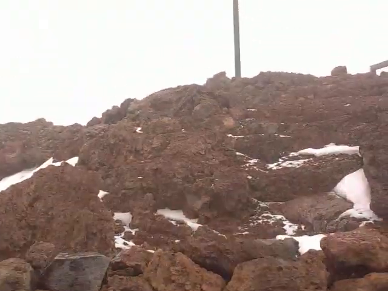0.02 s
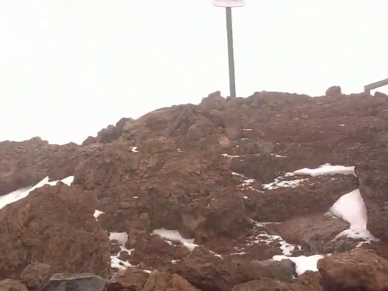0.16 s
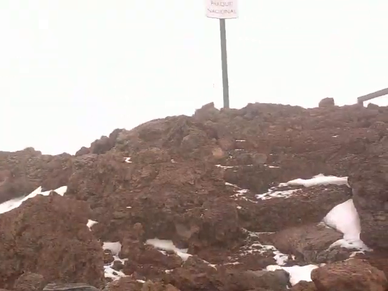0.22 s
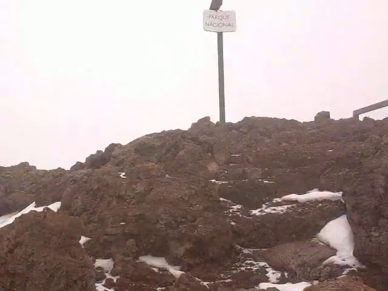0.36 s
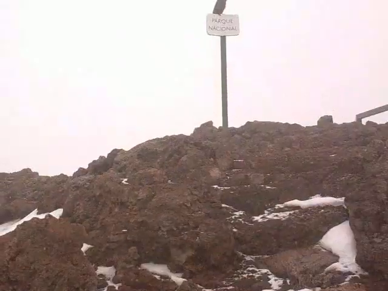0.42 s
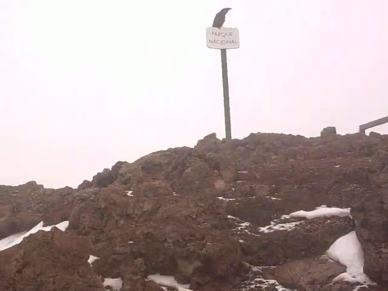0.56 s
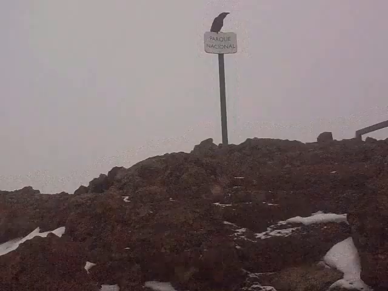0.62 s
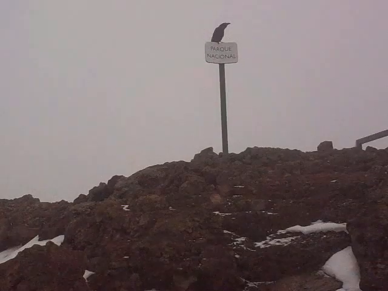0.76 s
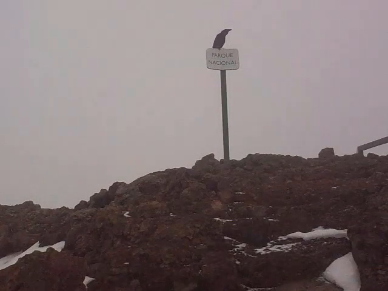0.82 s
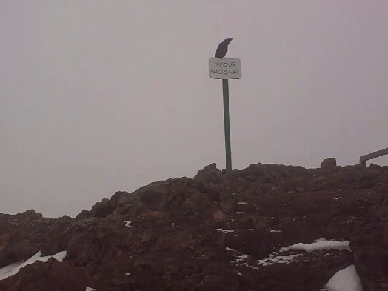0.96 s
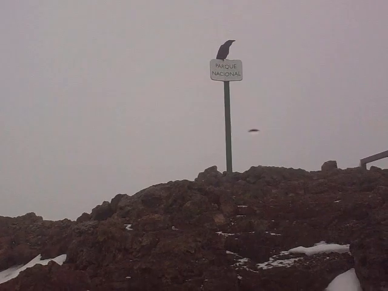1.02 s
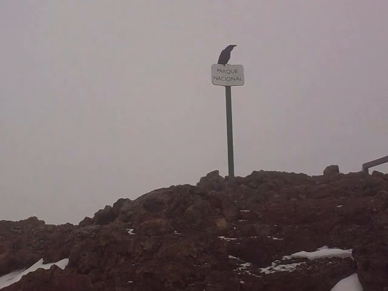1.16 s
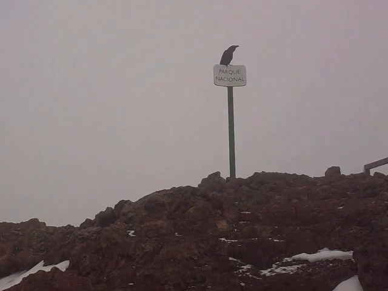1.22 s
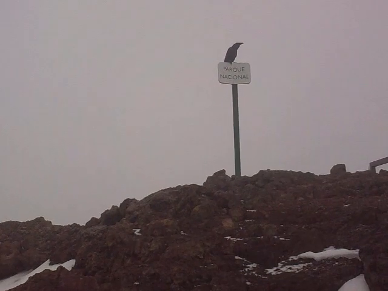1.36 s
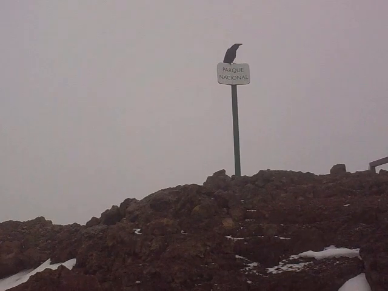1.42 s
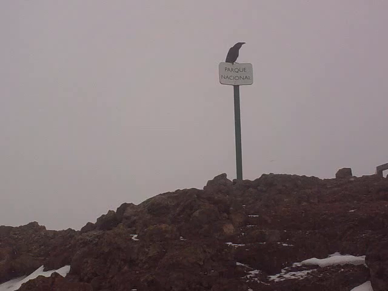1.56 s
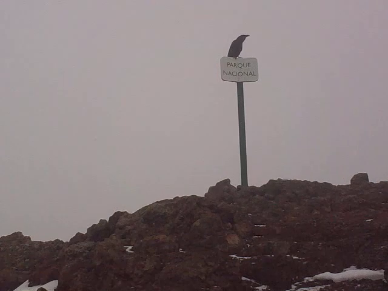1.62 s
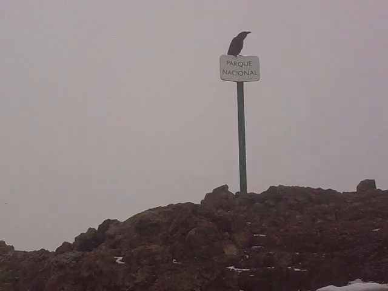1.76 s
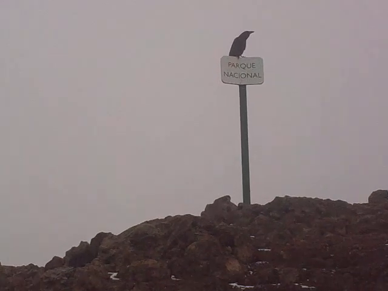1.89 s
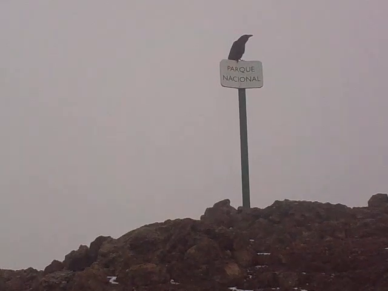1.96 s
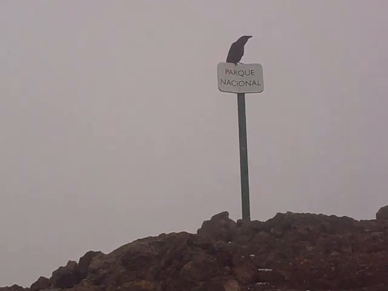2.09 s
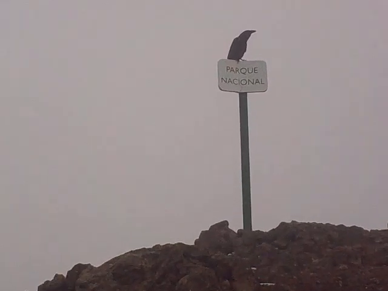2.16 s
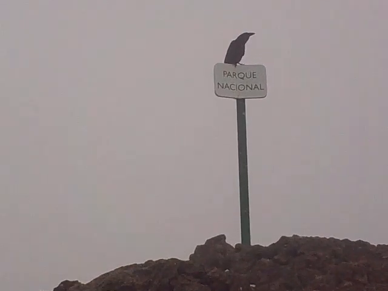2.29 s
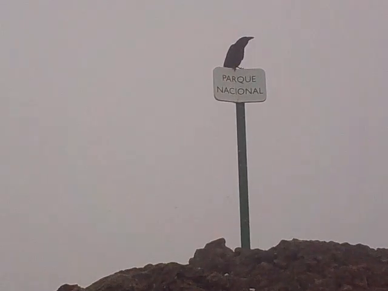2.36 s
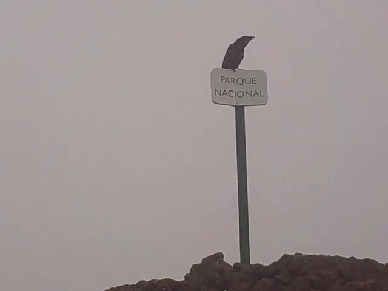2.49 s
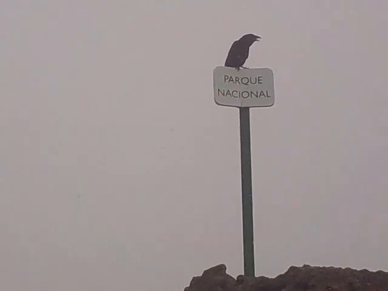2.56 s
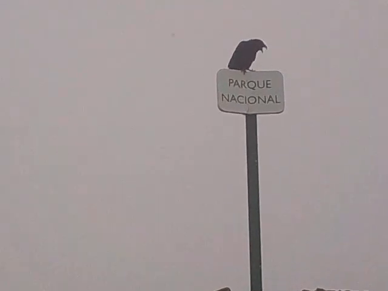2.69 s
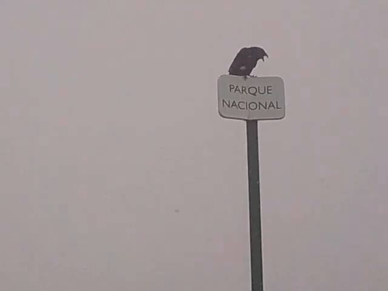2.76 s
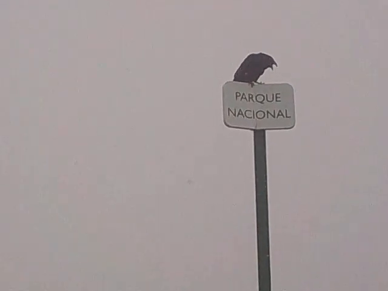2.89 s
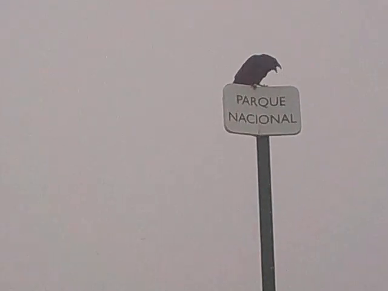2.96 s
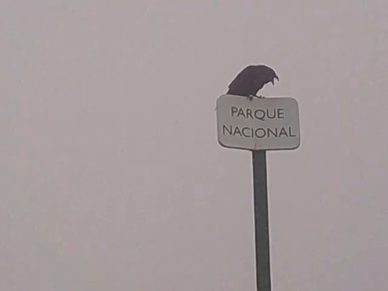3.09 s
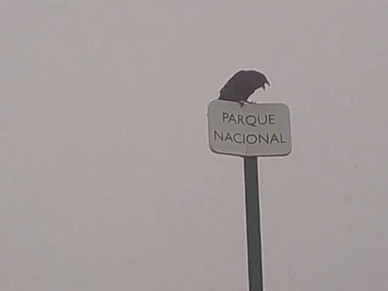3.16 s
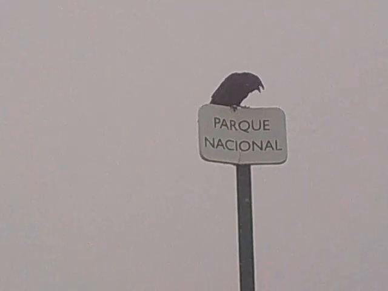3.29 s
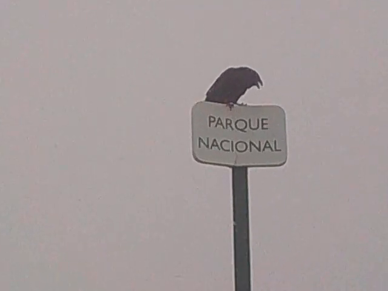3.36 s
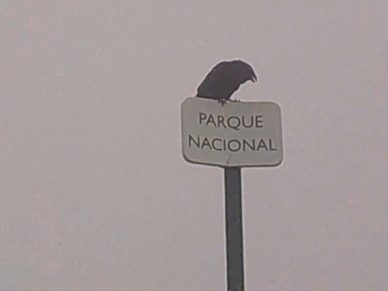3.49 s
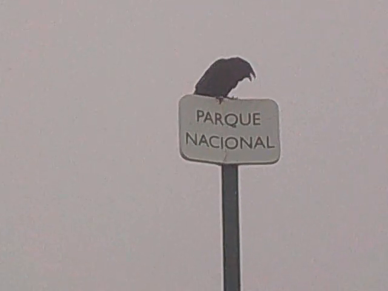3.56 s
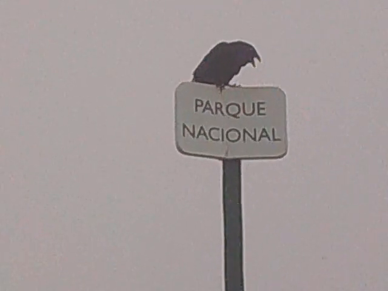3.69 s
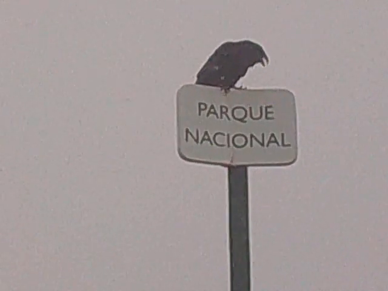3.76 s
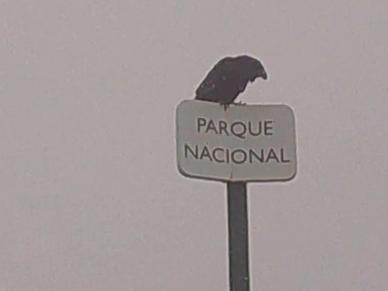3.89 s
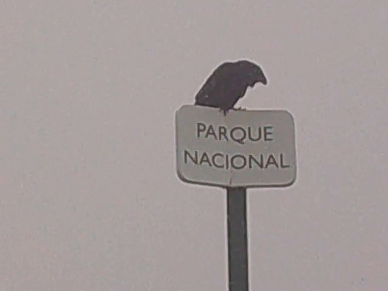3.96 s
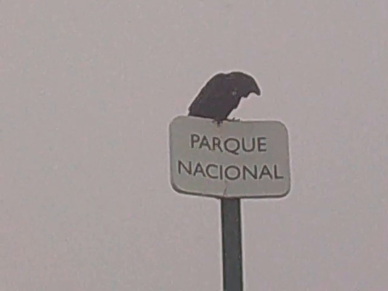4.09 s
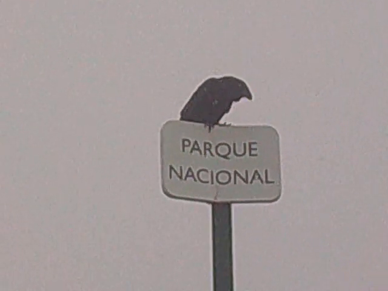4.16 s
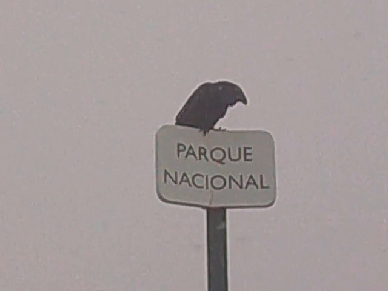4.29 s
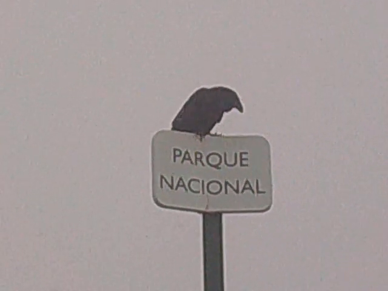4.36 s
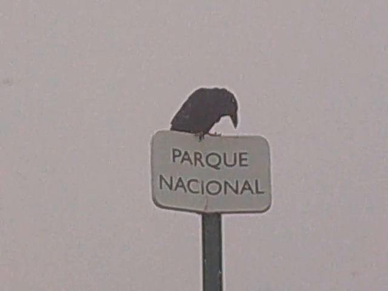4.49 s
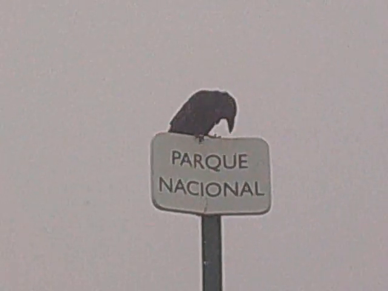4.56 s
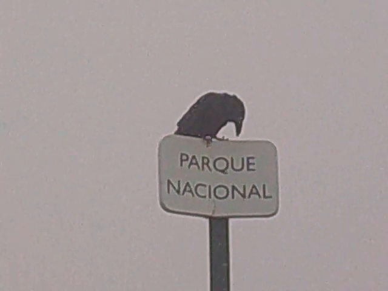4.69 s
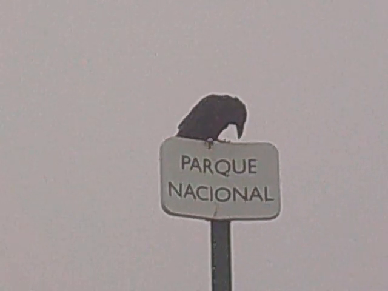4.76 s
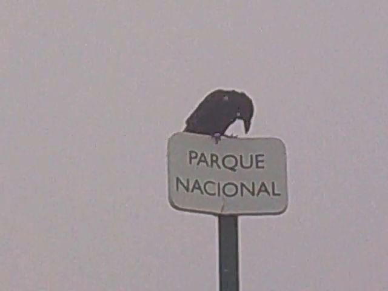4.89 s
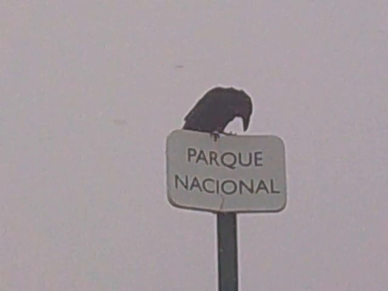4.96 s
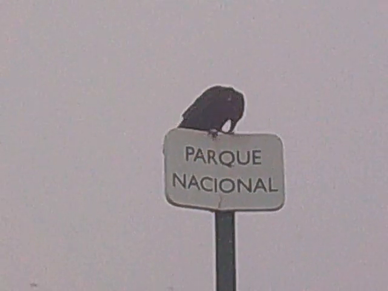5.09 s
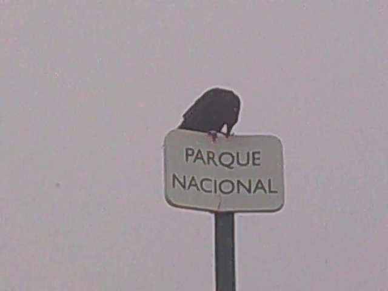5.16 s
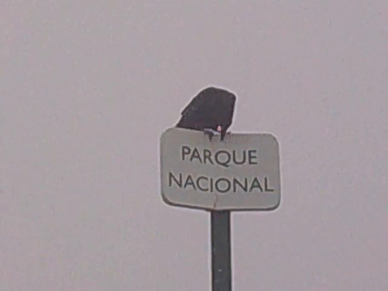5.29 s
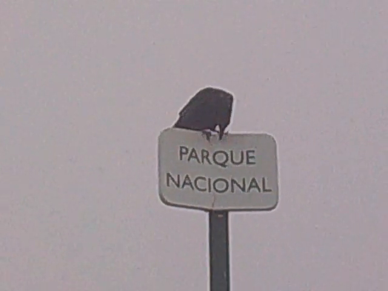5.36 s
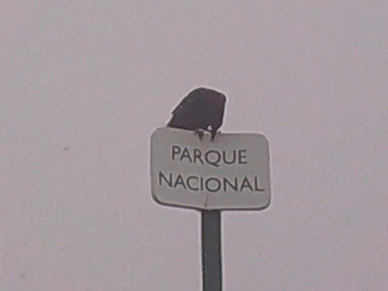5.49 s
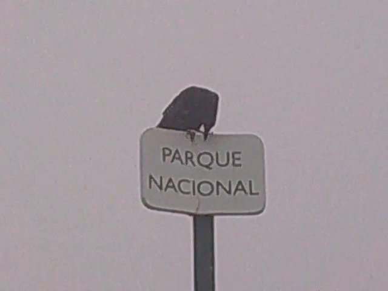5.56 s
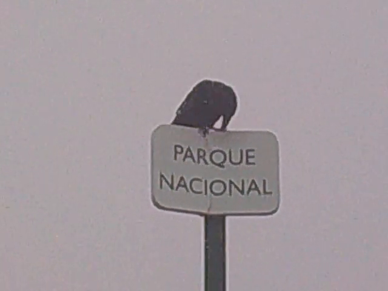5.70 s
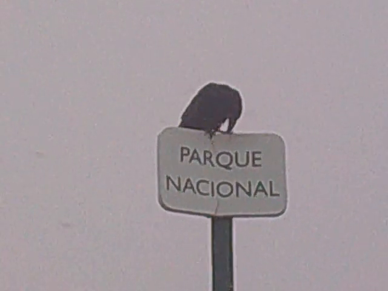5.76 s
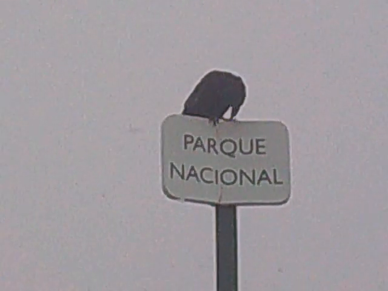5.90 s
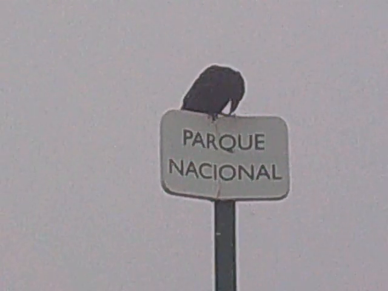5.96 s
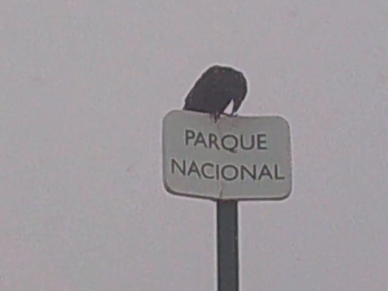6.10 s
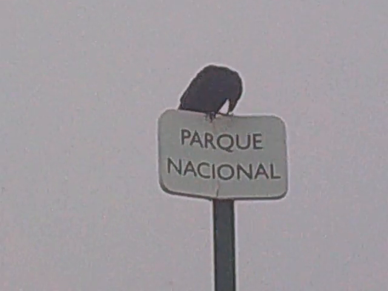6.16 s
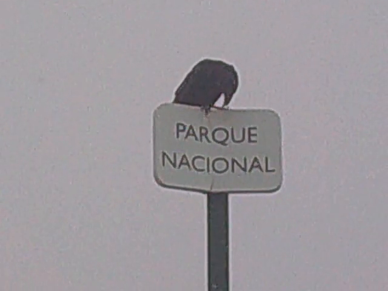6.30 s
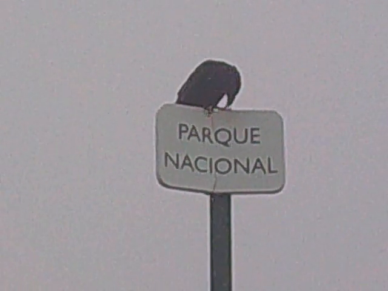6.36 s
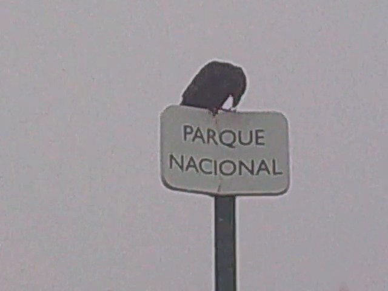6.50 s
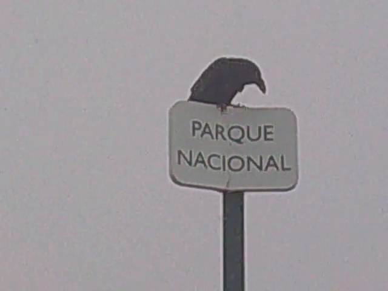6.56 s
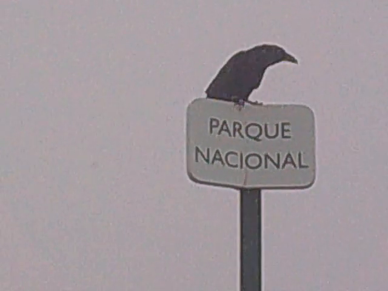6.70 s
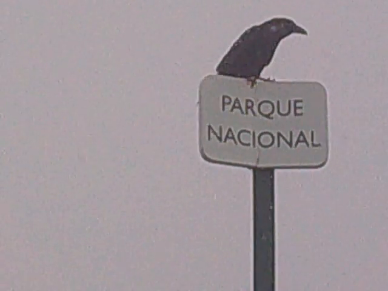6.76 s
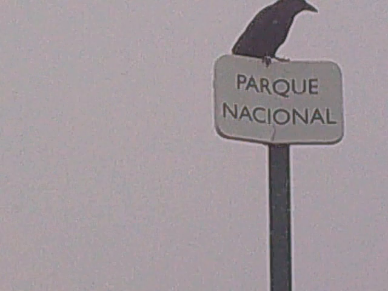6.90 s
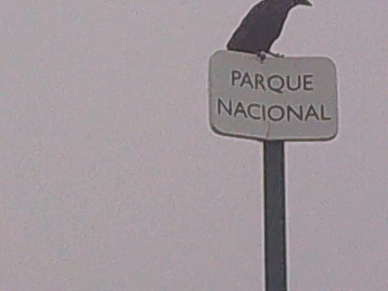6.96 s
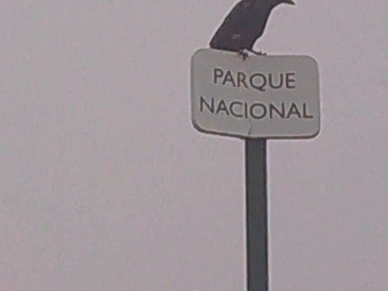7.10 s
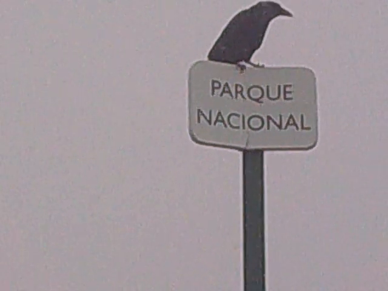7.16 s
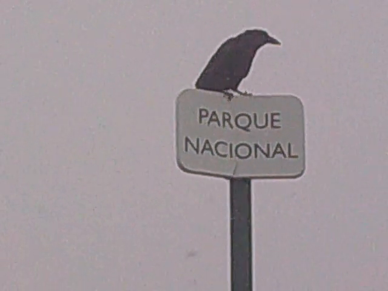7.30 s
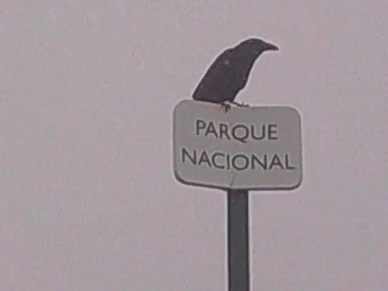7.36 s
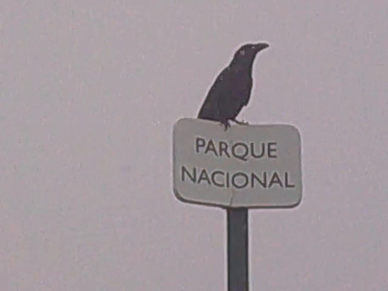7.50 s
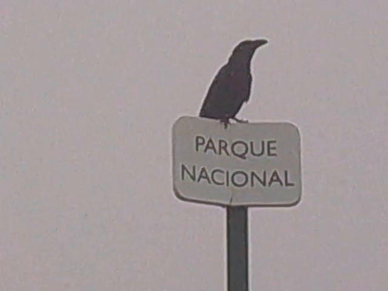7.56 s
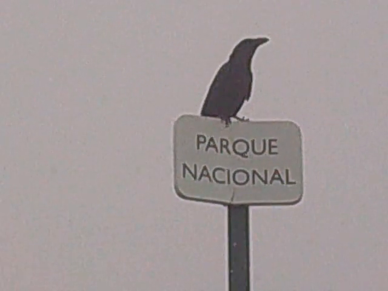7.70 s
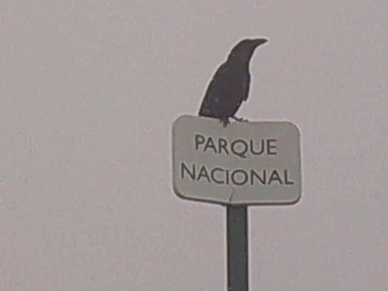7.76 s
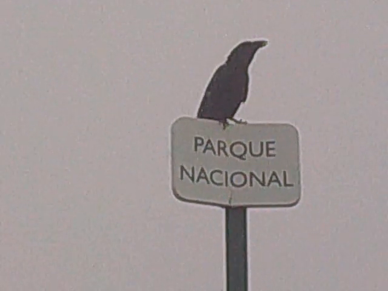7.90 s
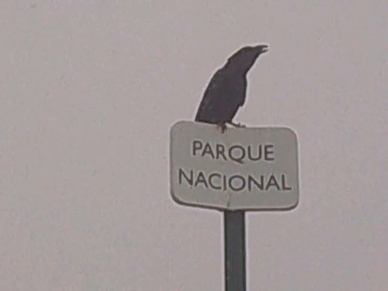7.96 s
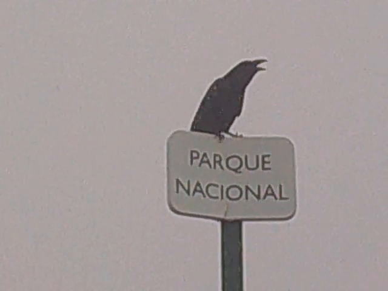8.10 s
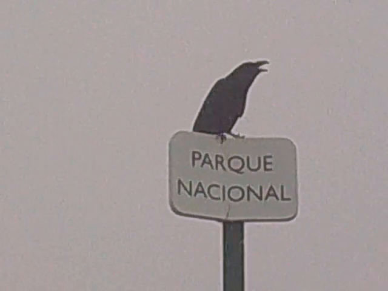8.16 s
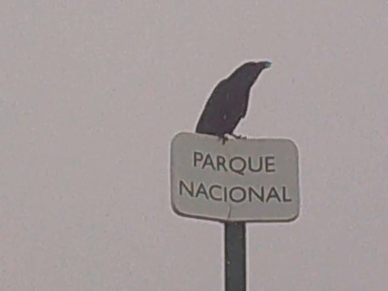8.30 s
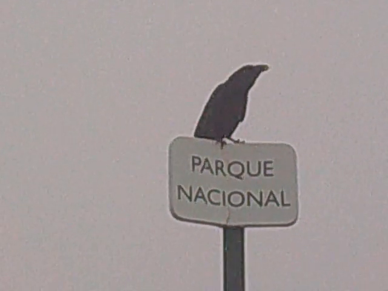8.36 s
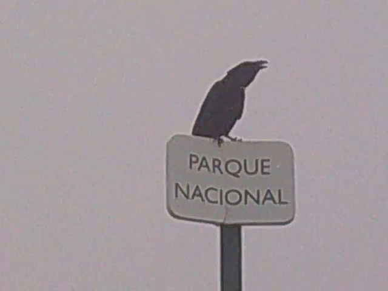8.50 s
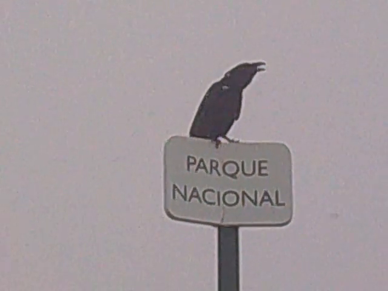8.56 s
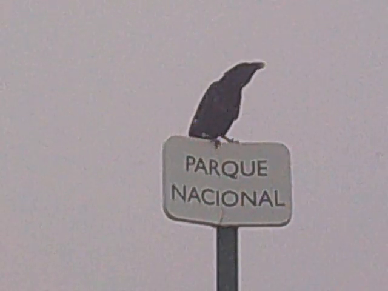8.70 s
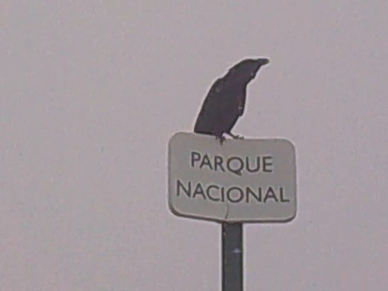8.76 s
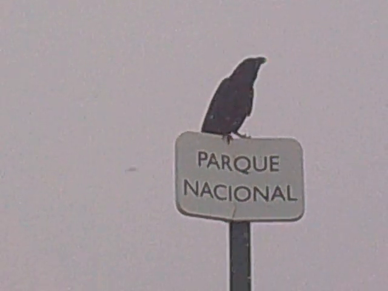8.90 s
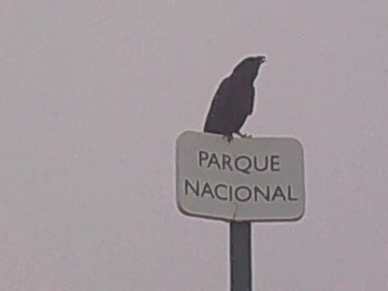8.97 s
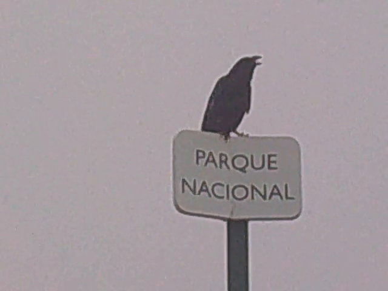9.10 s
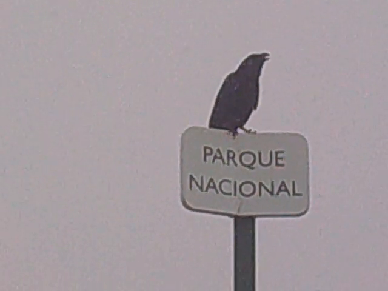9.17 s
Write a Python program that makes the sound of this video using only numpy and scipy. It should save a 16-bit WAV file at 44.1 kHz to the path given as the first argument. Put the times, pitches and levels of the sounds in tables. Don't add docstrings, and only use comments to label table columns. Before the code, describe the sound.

A raven croaks hoarsely in three spaced runs on a quiet foggy mountainside, over soft hiss, wind rumble, sleet ticks and handling bumps.

```python
import sys
import numpy as np
from scipy import signal
from scipy.io import wavfile
from scipy.ndimage import uniform_filter1d, minimum_filter1d

SR = 44100
rng = np.random.default_rng(int(sys.argv[2]) if len(sys.argv) > 2 else 0)


def gain_from_db(level_db):
    decades = np.asarray(level_db, float) / 20
    return 10 ** decades


def transcribe(signal):
    frames = np.atleast_2d(signal).T
    limited = np.clip(frames, -1, 1)
    pcm = np.round(limited * 32767).astype(np.int16)
    wavfile.write(sys.argv[1], SR, pcm)


N = 407484


def evened(x):
    return x / np.sqrt(np.mean(x ** 2) + 1e-20)


def levelled(x):
    power = uniform_filter1d(uniform_filter1d(x ** 2, size=1500), size=1500)
    return x / np.sqrt(power + 1e-20)


def read(points, hz):
    f, value = np.transpose(points)
    return np.interp(np.log(hz + 1), np.log(f + 1), value)


def add(mix, s, sound):
    part = mix[round(s * SR):][:len(sound)]
    part += sound[:len(part)]


def resonate(x, hz, width):
    turn = np.exp(2j * np.pi * np.cumsum(hz * np.ones(len(x))) / SR)
    r = np.exp(-np.pi * width / SR)
    return 2 * (turn * signal.lfilter([1 - r], [1, -r], x / turn)).real


def noise(colour, patchy_db, flicker_db, size=1024):
    frames, hz = N // (size // 4) + 5, np.fft.rfftfreq(size, 1 / SR)
    a, b, patches = rng.standard_normal((frames, len(hz), 3)).T
    patches = evened(uniform_filter1d(uniform_filter1d(patches, size=12, axis=0), size=12, axis=1))
    flicker = evened(uniform_filter1d(rng.standard_normal(frames), size=5))
    level_db = read(colour, hz)[:, None] + patchy_db * patches + flicker_db * flicker
    z = (a + 1j * b) * gain_from_db(level_db)
    return evened(signal.istft(z, nperseg=size, noverlap=size * 3 // 4)[1][:N])


CLIMB_DB = [-11, -18, -22.5]
ONSET_S = [.006, .013, .014]
CLIMB_SHUT = [0.49, 0.54, 1]
FALL_SHUT = [0.25, 0.038, 0.17]
UPPER_DB = [-4.5, -4, -1]


def arch(age, climb, fall, effort_db, top_hz, pose, sag):
    rest_hz, wide_hz = 243.2, 357
    before = np.clip(1 - age / climb, 0, 1)
    after = np.clip((age - climb) / fall, 0, 1)
    span = 1 - rest_hz / top_hz
    rising = span * before ** 2.1
    falling = sag * span * after ** 2.6
    onset_db = -33 * np.exp(-age / ONSET_S[pose])
    release_db = -29.5 * np.exp((age - climb - fall) / .011)
    effort_db = effort_db + CLIMB_DB[pose] * rising - 5 * falling + onset_db + release_db
    hz = top_hz * (1 - rising - falling)
    upper_db = UPPER_DB[pose] - 18 * after ** 3.35
    mouth = top_hz / wide_hz * (1 - CLIMB_SHUT[pose] * rising - FALL_SHUT[pose] * falling)
    return effort_db, hz, upper_db, mouth


def flutter(t, flap_s, slowing_s, choked_s, depth):
    age = np.arange(min(flap_s, t[0]) - .02, t[-1] + 1 / SR, 1 / SR) - flap_s
    period_s = .0145 - .0065 * np.exp(-np.maximum(age, 0) / slowing_s)
    flaps = np.cumsum(1 / period_s) / SR
    flaps = (flaps - np.interp(0, age, flaps))[-len(t):]
    age = age[-len(t):]
    choked = np.clip(1.4 - age / choked_s, 0, 1)
    depth = np.clip(np.maximum(depth, .95 * choked), 0, 1)
    return age, flaps, choked, depth


def throat(air, resonances, mouth, skirt):
    out = 0
    for k, (hz, width, db) in enumerate(resonances):
        ring = resonate(resonate(air, hz * mouth, width), hz * mouth, skirt * width)
        out = out + (-1) ** k * gain_from_db(db) * ring
    return out


# [f/Hz, width f/Hz, level/dB]
LOWER_THROAT = [(1367, 102, 15), (1787, 293, -1), (2180, 200, -16.5)]
# [f/Hz, width f/Hz, level/dB]
UPPER_THROAT = [
    [(2890, 390, 0.5), (3400, 680, -8), (4010, 250, 3.5), (4800, 510, -14), (5900, 1000, -16.5),
     (8950, 3500, -26.5)],
    [(3060, 806, -5), (3400, 890, -1.5), (4080, 146, -0.5), (4416, 200, -4), (7500, 5450, -18.5),
     (9000, 3800, -14.5)],
    [(2690, 370, -17), (3200, 200, -3), (3850, 350, -5.5), (4640, 270, -10.5), (5530, 470, -14),
     (7770, 1700, -21)],
]
# [level/dB, level/dB, level/dB]
CHEST = [
    (-23.5, -27, -23.5),
    (-25.5, -27, -46),
    (-23, -18, -16),
]


def croak(row, sag, flap_s, slowing_s, choked_s, pose, depth):
    jitter, shimmer_db, breath, rasp = .032, 1.5, .26, .5
    pose = round(pose)
    start, climb, fall, *top = row
    t = np.arange(max(start, 0), start + climb + fall, 1 / SR)
    effort_db, hz, upper_db, mouth = arch(t - start, climb, fall, *top, pose, sag)
    wander, tremble, air = rng.standard_normal((3, len(t)))
    age, flaps, choked, depth = flutter(t, flap_s, slowing_s, choked_s, depth)
    wobble = .05 * depth * np.cos(2 * np.pi * (flaps - .3))
    unsteady = jitter * np.sqrt(depth) * evened(uniform_filter1d(wander, size=160))
    turns = np.cumsum(hz * (1 + unsteady + wobble)) / SR
    for at in np.flatnonzero(np.diff(np.floor(flaps))):
        turns[at:] -= choked[at] * ((turns[at] + .6) % 1 - .5)
    swell = (.5 + .5 * np.cos(2 * np.pi * (flaps - .12))) ** 1.5
    burst = np.exp(-(flaps % 1) / .24)
    throb = 1 - depth + depth * (choked * burst + (1 - choked) * swell)
    throb = throb * gain_from_db(shimmer_db * np.clip(evened(uniform_filter1d(tremble, size=130)), -2, 1.5))
    pulses = evened(sum(np.cos(2 * np.pi * k * turns) / (1 + (k / 17) ** 4) for k in range(1, 36)))
    puffs = evened(np.exp(-(turns % 1) / .3) * air)
    drive = -throb * (pulses + breath * puffs)
    lower = throat(drive, LOWER_THROAT, mouth, 4.8)
    rough = (drive + rasp * throb * puffs[::-1]) * np.sqrt(throb)
    upper = throat(rough, UPPER_THROAT[pose], 1, 2.63)
    chest = sum(gain_from_db(db) * np.sin(2 * np.pi * k * turns) for k, db in enumerate(CHEST[pose], 1))
    chest = chest * (0.11 + 1.7 * throb)
    opening = np.clip(age / (0.43 * choked_s), .2, 1) ** 0.75
    voice = levelled(lower) + gain_from_db(upper_db) * opening * levelled(upper)
    voice = voice + np.sqrt(2) * gain_from_db(0.3 * upper_db) * chest
    return t[0], gain_from_db(effort_db) * voice * np.clip((t[-1] - t) / 0.0059, 0, 1)


# [start t/s, climb t/s, fall t/s, top effort level/dB, top pitch f/Hz]
CROAKS = [
    (-.15, 0.13, 0.095, -25, 361),
    (.296, .125, .072, -28, 321.7),
    (2.799, 0.17, 0.099, -24, 362.8),
    (3.256, 0.13, 0.092, -23, 361.2),
    (3.775, .135, .07, -25, 341),
    (8.222, .14, .076, -30, 361.3),
    (8.722, .103, .066, -31.5, 350.4),
    (9.201, 0.19, 0.059, -30, 354),
]
SAG = [0.96, 1, 1, 0.72, 0.89, 0.464, .9, 1]
# [first flap t/s, slowing t/s, choked t/s, head pose, flutter depth 0-1]
FLAPS = [
    (-.1525, .05, .07, 0, .5),
    (.3092, .07, .008, 0, .33),
    (2.8044, .07, .07, 1, .38),
    (3.2603, .045, .065, 1, .55),
    (3.779, .045, .06, 1, .5),
    (8.2326, .047, .05, 2, .42),
    (8.736, .035, .05, 2, .5),
    (9.2089, .06, .06, 2, .5),
]


def raven():
    bird = np.zeros(N)
    for row, sag, flap in zip(CROAKS, SAG, FLAPS):
        add(bird, *croak(row, sag, *flap))
    return bird


# [f/Hz, level/dB per Hz]
HISS = [(15, 7), (25, -5.5), (177, -4.5), (378, -9), (510, -6.5), (568, -11.5), (854, -12.5), (952, -10.5),
        (1120, -11), (3600, -13.5), (6040, -21), (8370, -17.5), (13300, -22), (15200, -20), (16500, -77)]


def hiss():
    return gain_from_db(-60) * noise(HISS, 1.0, 0.88)


# [f/Hz, width f/Hz, level/dB]
HUM = [(181, 25.5, -69), (885.4, 6.5, -82.5)]


def hum():
    return sum(gain_from_db(db) * evened(resonate(rng.standard_normal(N), hz, width)) for hz, width, db in HUM)


CALM_DB = -65
# [middle t/s, level/dB, half-length t/s]
GUSTS = [(.28, -55.5, 0.27), (.95, -75, 0.19), (1.57, -57, 0.08), (2.073, -71, 0.21), (3.806, -54.5, 0.097),
         (4.08, -74, 0.18), (4.917, -57, 0.084), (6.356, -59, 0.057), (7.024, -53, 0.11),
         (7.25, -58, 0.071), (8.103, -80, 0.077), (8.75, -69, .2), (9.24, -54, 0.12)]


def gusts():
    t = np.arange(N) / SR
    bumps = sum(gain_from_db(db - CALM_DB) * np.exp(-((t - s) / half) ** 2) for s, db, half in GUSTS)
    return 20 * np.log10(1 + bumps)


# [f/Hz, level/dB per Hz]
WIND_COLOUR = [(20, -9), (50, -3), (120, -12.5), (300, -18), (800, -51)]
AIR_COLOUR = [(900, 9), (2000, -21), (3600, 7), (5000, 8), (7000, -10)]


def wind():
    air_db, follows, lag_s = -72.5, 0.85, 0.44
    gust_db = gusts()
    rumble = gain_from_db(CALM_DB + gust_db) * noise(WIND_COLOUR, 2.0, 2.0, size=2048)
    slow_db = uniform_filter1d(gust_db, round(lag_s * SR))
    return rumble + gain_from_db(air_db + follows * slow_db) * noise(AIR_COLOUR, 0.95, 1.0)


GROUND = [
    (1.3, -3, -0.059),
    (2.1, -2.5, 0.034),
    (4.6, 1.5, 0.23),
]


def bounces(bird):
    out = np.zeros(N)
    for ms, db, sign in GROUND:
        out += sign * gain_from_db(db) * np.pad(bird, (round(ms * SR / 1000), 0))[:N]
    return out


# [f/Hz, t/s]
ROCKS = [(500, 0.5), (1400, 0.29), (3500, 0.3), (8000, 0.18)]


def rocks(bird):
    eddies = .35 + .92 * evened(uniform_filter1d(rng.standard_normal(N), size=200))
    taps = np.zeros(SR // 2)
    at = np.arange(500, SR // 2 - 20, 20)
    taps[at + rng.integers(0, 20, len(at))] = rng.choice([-1., 1.], len(at))
    hz, t, z = signal.stft(taps, SR, nperseg=256)
    tail = signal.istft(z * gain_from_db(-60 * t / read(ROCKS, hz)[:, None]), SR, nperseg=256)[1]
    return signal.fftconvolve(bird * eddies, tail / np.linalg.norm(tail))[:N]


def tick(db, hz):
    burst = rng.standard_normal(3500)
    t = np.arange(len(burst)) / SR
    t60 = 0.037 * gain_from_db(-0.44 * (db + 42.5))
    decay = gain_from_db(-60 * t / max(t60, .005)) + gain_from_db(-17 - 60 * t / .12)
    shape = np.clip(t / .0008, 0, 1) * decay
    ring = resonate(resonate(burst, hz, 1200), hz, 5100)
    case = resonate(resonate(burst, 7150, 4900), 6100, 5500)
    return gain_from_db(db - 3.5) * evened(ring + gain_from_db(-7.5) * case) * shape


# [t/s, peak
# level/dB, centre f/Hz]
SLEET = [(0.1165, -40, 7350), (0.849, -42.5, 7600), (0.9028, -48.5, 7620), (0.94, -48, 8150),
         (2.5867, -34.5, 7600), (4.0647, -44, 9100), (4.1324, -41.5, 6700), (4.234, -36.5, 7900),
         (4.2946, -49, 7340), (5.3851, -41.5, 8850), (5.596, -46.5, 7140), (6.4497, -49.5, 9000),
         (6.4966, -46, 7060), (7.235, -45, 7740), (7.355, -36, 5560), (7.449, -45.5, 8400),
         (7.5263, -48.5, 7850), (7.9603, -42, 8140), (8.7184, -43, 7460), (9.0504, -49, 6640),
         (0.802, -47.5, 4500), (1.0246, -47.5, 4900), (1.306, -47, 4450), (1.8498, -48.5, 5870),
          (1.994, -52, 4200), (2.2793, -44, 3560), (2.2993, -29, 4900), (2.66, -42, 3500),
          (3.5335, -47, 3400), (3.674, -52, 4660), (4.0323, -43.5, 5600), (4.4692, -42, 5210),
          (4.813, -49, 5330), (4.9536, -52, 3950), (5.764, -42.5, 4140), (5.8522, -40, 4930),
          (6.378, -49, 5740), (6.391, -43.5, 4400), (6.933, -45, 4260), (7.0101, -39, 3200),
          (8.4257, -37.5, 3070), (8.5984, -52, 3360), (8.9433, -39, 4930), (5.716, -47.5, 3700),
          (5.955, -53, 5500), (6.693, -49.5, 4200), (6.752, -52, 4540), (6.787, -48.5, 4500)]


def sleet():
    out = np.zeros(N)
    for s, db, hz in SLEET:
        add(out, s, tick(db, hz))
    return out


def knock(db, sign, hz, rise_ms, ring_db, sharpness, soft_ms, modes):
    lead_count = 200
    t = np.arange(1800) / SR
    loss = np.pi * hz / sharpness
    turn = np.sqrt(max((2 * np.pi * hz) ** 2 - loss ** 2, 1))
    step = np.exp(-loss * t) * (np.cos(turn * t) - loss / turn * np.sin(turn * t))
    lead = np.exp(-np.arange(lead_count, 0, -1) / SR / (rise_ms / 1000))
    contact = np.exp(-.5 * (np.arange(-40, 41) / SR / (soft_ms / 1000)) ** 2)
    push = np.convolve(np.concatenate([lead, step]), contact / contact.sum(), "same")
    ring = sum(gain_from_db(level - 60 * t / t60) * np.sin(2 * np.pi * f * t) for f, t60, level in modes)
    return sign * gain_from_db(db) * (push + gain_from_db(ring_db) * np.pad(ring, (lead_count, 0)))


def knocks(rows, sharpness, soft_ms, modes):
    out = np.zeros(N)
    for s, *row in rows:
        add(out, s - 200 / SR, knock(*row, sharpness, soft_ms, modes))
    return out


# [f/Hz, 60 dB decay t/s, level/dB]
BUTTON = [(496, 0.02, -1.5), (1386, 0.009, 3), (2130, 0.009, -5), (2880, 0.0055, 4), (4400, 0.0055, 3),
          (7400, 0.0046, -15)]
# [t/s, peak level/dB, sign, membrane f/Hz, rise t/ms, case ring level/dB]
PRESSES = [
    (1.5025, -15.5, 1, 225, .6, -11),
    (5.6441, -16.5, 1, 225, .6, -9),
    (3.8474, -13, -1, 175, .7, -19),
    (5.9327, -14.5, -1, 175, .7, -21),
]


def presses():
    return knocks(PRESSES, sharpness=1.1, soft_ms=.044, modes=BUTTON)


# [f/Hz, 60 dB decay t/s, level/dB]
CASE = [(2040, 0.0038, 3), (2950, 0.0026, 2), (4600, .004, -8), (5130, 0.0071, -6.5), (5880, 0.0027, 4.5),
        (7430, 0.0035, 1), (8380, 0.0018, 2.5), (10650, 0.0094, -16)]
# [t/s, peak level/dB, sign, membrane f/Hz, rise t/ms, case ring level/dB]
POPS = [
    (1.5916, -5, -1, 100, .03, -5),
    (5.9362, -27, 1, 900, .1, -6),
]


def pops():
    return knocks(POPS, sharpness=.62, soft_ms=.017, modes=CASE)


def puff(db, hz, length_s, width):
    count = round(length_s * SR)
    swell = resonate(resonate(rng.standard_normal(count), hz, width), hz, 1.4 * width)
    return gain_from_db(db) * evened(swell) * np.hanning(count)


# [t/s, level/dB, centre f/Hz, length t/s, width f/Hz]
PUFFS = [
    (6.31, -60, 1900, .09, 900),
    (6.77, -70, 3450, .17, 18),
    (5.94, -62, 2500, .045, 150),
]


def scuffs():
    out = np.zeros(N)
    for s, *row in PUFFS:
        add(out, s, puff(*row))
    return out


# [start t/s, length t/s, level/dB, change over the stroke level/dB]
RUB = [
    (6.875, .016, -47, -3),
    (6.904, 0.14, -51, 3),
    (7.015, 0.137, -43.5, -3.5),
    (7.158, 0.059, -48, -20),
    (7.253, 0.056, -60.5, -6),
]


def strokes():
    out = np.zeros(N)
    for s, length, db, change_db in RUB:
        t = np.arange(0, length, 1 / SR)
        edges = np.clip(np.minimum(t, length - t) / .008, 0, 1)
        add(out, s, gain_from_db(db + change_db * t / length) * edges)
    return out


# [f/Hz, level/dB per Hz]
RUB_COLOUR = [(35, -37), (60, -4), (171, -3), (536, -3.5), (721, -19), (906, -6), (1060, -12.5),
              (1680, -17.5), (14000, -36)]


def rub():
    return strokes() * noise(RUB_COLOUR, 1.3, 2.5, size=256)


# [f/Hz, 60 dB decay t/s, level/dB]
PORT = [(3300, .012, 0), (4200, .007, -4)]
# [t/s, peak level/dB, sign, membrane f/Hz, rise t/ms, hole ring level/dB]
LIFTS = [
    (6.8835, -31, 1, 200, .06, -26),
    (7.0113, -21, -1, 110, .15, -4),
    (7.158, -25, 1, 150, .1, -24),
    (9.149, -8, 1, 105, .04, -36),
]


def lifts():
    return knocks(LIFTS, sharpness=.62, soft_ms=.04, modes=PORT)


def scene():
    bird = raven()
    camera = hiss() + hum() + wind()
    near = bird + bounces(bird)
    touches = sleet() + presses() + pops() + scuffs() + rub() + lifts()
    return (gain_from_db(-1.5) * near + gain_from_db(-22.5) * rocks(bird) + touches + camera)[None]


def starved(x):
    from_hz, loud_db = 10500, -52
    hz, t, z = signal.stft(x, SR, nperseg=512)
    power = minimum_filter1d((abs(z) ** 2).sum(-2, keepdims=True), size=5)
    level_db = 10 * np.log10(uniform_filter1d(power, size=9) + 1e-12)
    streaks = uniform_filter1d(rng.standard_normal(z.shape), size=17, axis=-1)
    streaks = evened(uniform_filter1d(streaks, size=3, axis=-2))
    share = np.clip((level_db - loud_db) / 6, 0, 1) * np.clip((hz[:, None] - from_hz) / 3000, 0, 1)
    loss_db = -25 * np.clip(2 * (streaks + 4 * share - 3), 0, 1) - 2 * share
    return signal.istft(z * gain_from_db(loss_db), SR, nperseg=512)[1][:, :N]


def top_cut(x):
    return signal.sosfilt(signal.butter(12, 16740, fs=SR, output="sos"), x)


def record(dry):
    ceiling, edge_hz = .74, 15900
    clipped = np.clip(dry, -ceiling, ceiling)
    low_pass = signal.firwin(255, edge_hz, window=("kaiser", 9), fs=SR)
    limited = signal.oaconvolve(clipped, low_pass[None], "same")
    return top_cut(starved(limited))


dry = scene()
out = record(dry)
transcribe(out)
```